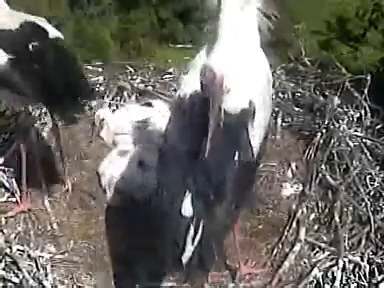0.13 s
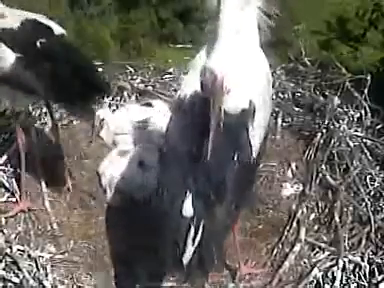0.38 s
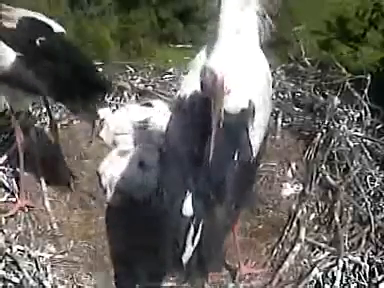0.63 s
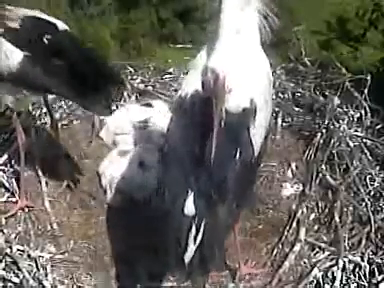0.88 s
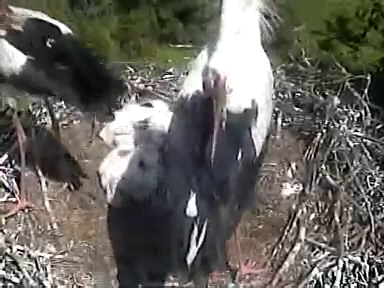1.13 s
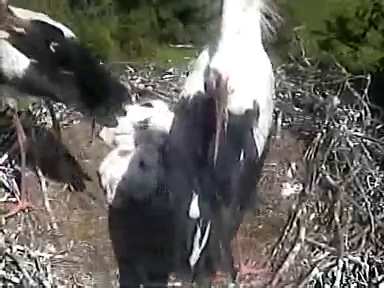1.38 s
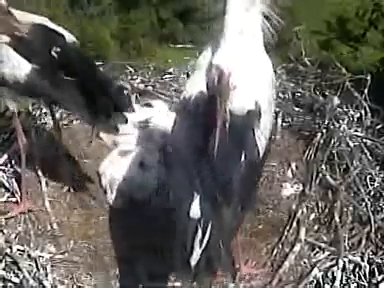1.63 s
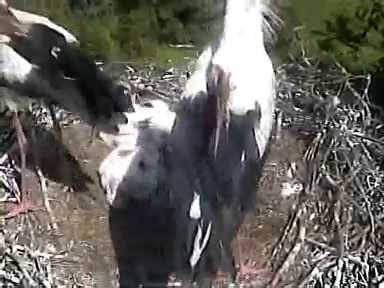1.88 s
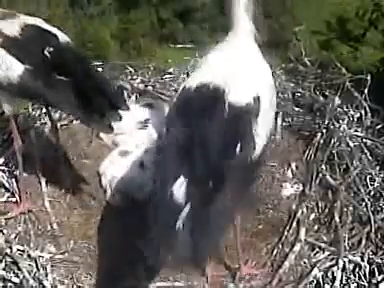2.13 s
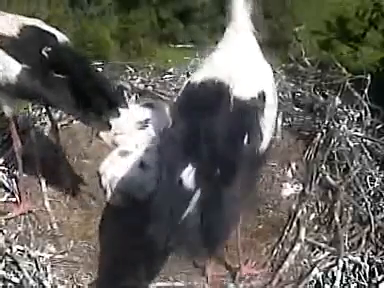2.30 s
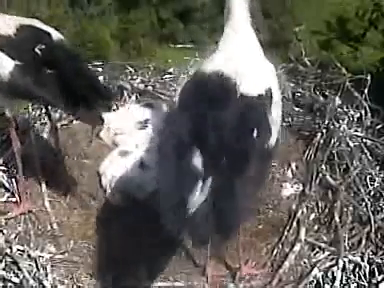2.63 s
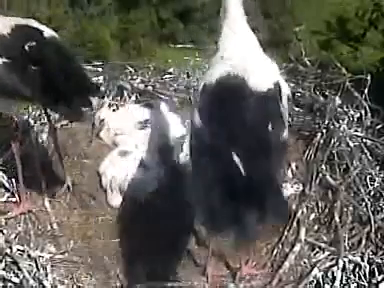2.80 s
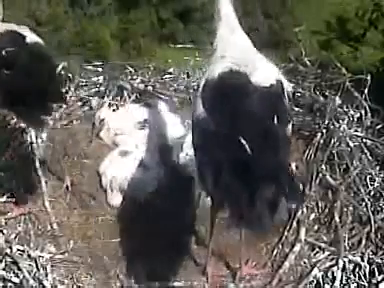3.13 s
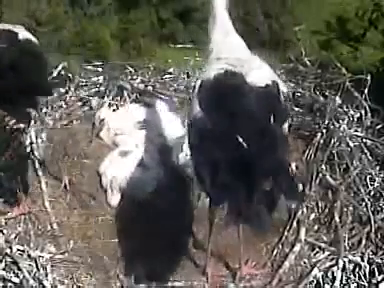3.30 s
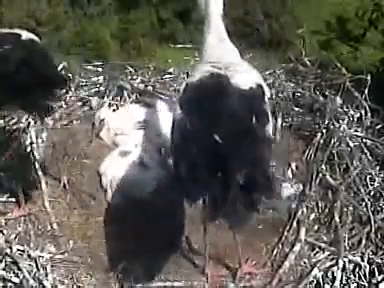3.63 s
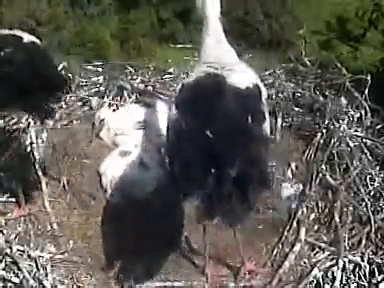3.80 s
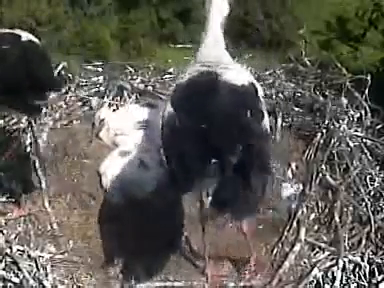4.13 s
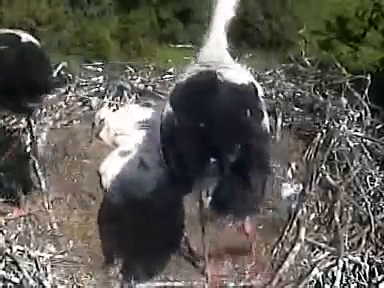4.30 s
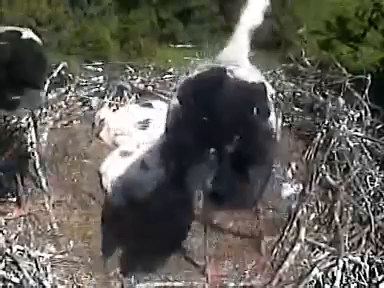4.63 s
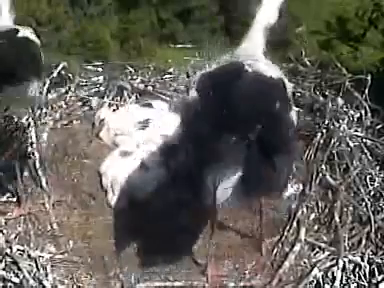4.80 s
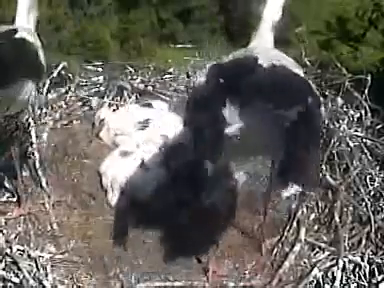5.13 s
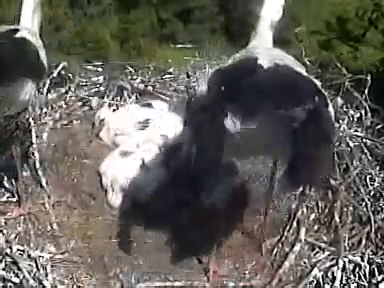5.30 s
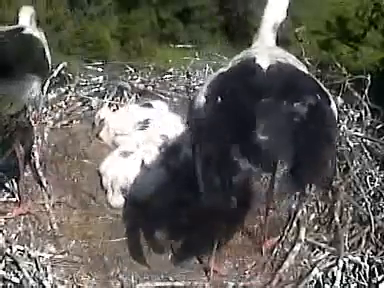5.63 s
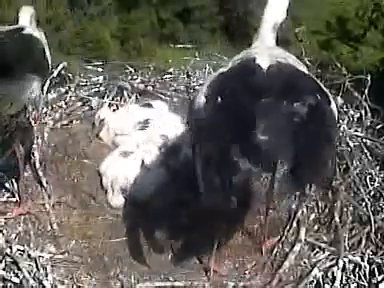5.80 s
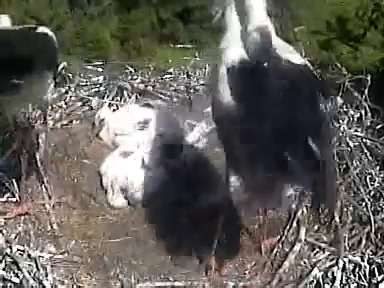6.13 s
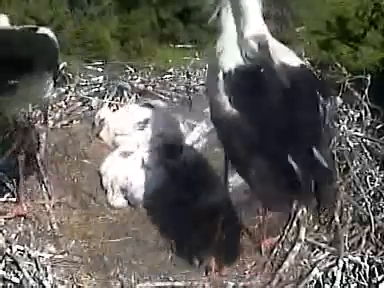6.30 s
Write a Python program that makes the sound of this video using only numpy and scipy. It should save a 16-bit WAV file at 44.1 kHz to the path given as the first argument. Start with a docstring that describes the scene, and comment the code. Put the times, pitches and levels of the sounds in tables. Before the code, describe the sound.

Rapid wooden bill clattering from two storks at a nest, drifting in and out of step, with faint leaves and wind behind.

```python
"""At a nest outdoors, two storks clatter their bills, each at its own pace, drifting in and out of step.
Every clap rings the throat pouch, the hollow bill and its horn; the pitch moves as the neck bends.
Twigs and feathers scatter each clap into a short tail, and a patchy fizz clings to it.
Behind them sits a bed of leaves and distant air; wind rumbles on a mono microphone that overloads."""
import sys
import numpy as np
from scipy import signal
from scipy.io import wavfile
from scipy.ndimage import uniform_filter1d

SR = 44100
rng = np.random.default_rng(int(sys.argv[2]) if len(sys.argv) > 2 else 0)


def store_wav(level_fs):
    """Save 16-bit WAV to argv[1]."""
    pcm = np.round(np.clip(np.atleast_2d(level_fs), -1, 1) * 32767)
    wavfile.write(sys.argv[1], SR, pcm.T.astype(np.int16))


N = 285327

# leaves and distant air, fader ride: t/s, level/dB
AIR_RIDE = [(0.0, -27.5), (0.59, -38), (0.83, -33.5), (1.22, -36.5), (1.55, -37), (1.96, -40), (2.38, -37),
            (2.74, -38), (2.92, -35), (3.73, -38.5), (4.56, -34), (4.76, -36.5), (6.47, -34.5)]
# their tone colour: f/Hz, relative density/dB
AIR_COLOUR = [(200, -50), (400, 5), (700, -2.5), (1100, -1.5), (1750, -2), (3100, -9.5), (4740, -15),
              (5370, -12.5), (7070, -29.5), (9000, -28.5)]
# gusts on the microphone: t/s, level/dB
WIND_RIDE = [(0.0, -31), (0.05, -19.5), (0.14, -21), (0.2, -16.5), (0.31, -19), (0.95, -30), (0.97, -23.5),
             (1.26, -32), (1.51, -25.5), (1.58, -34), (3.26, -27), (3.33, -33), (3.44, -20), (3.49, -27),
             (3.87, -22), (3.91, -29), (4.14, -23), (4.18, -26.5), (5.06, -23.5), (5.32, -21.5),
             (5.49, -26), (5.53, -22), (6.27, -27), (6.47, -26)]
# their tone colour: f/Hz, relative density/dB
WIND_COLOUR = [(12, -32), (20, -2.5), (49, 3), (139, -7.5), (257, -13), (370, -26), (450, -17), (580, -38),
               (990, -120)]
# hiss around the claps: f/Hz, level/dB relative to the claps in that band
FIZZ_COLOUR = [(300, -2.5), (750, -16), (1100, -9.5), (1600, -16.5), (2500, -8.5), (3500, -8.5), (4500, 0),
               (5400, -2), (6200, -3.5), (7500, 7)]
# early reflections at the nest: delay/s, level/dB
NEST_ECHOES = [(.015, -33), (.024, -27.5)]
# horn modes of the mandibles: f/Hz, level/dB relative to crack or tip snap, t60/s
HORN_MODES = [(400, -4, 0.0029), (1307, -1.5, 0.0042), (2076, -9.5, 0.023), (3160, -7, 0.017),
              (3568, -5.5, 0.0089), (4123, -7, 0.029), (4915, -8.5, 0.0073), (5320, -6, 0.013),
              (6797, -11, .008)]
# neck and bill posture, near then far bird, levels relative to the clap: t/s, pouch f/Hz, pouch level/dB,
# main bill mode f/Hz, second mode f/Hz, second mode level/dB, crack level/dB, snap level/dB, bill t60/ms
POSTURES = [
    [(0.05, 731, -9.5, 1541, 2360, -12.5, -9.5, -11.5, 16), (1.2, 755, -4, 1582, 2550, -11.5, -6, -7, 15),
     (1.6, 760, -2, 1634, 2620, -3, -3.5, -5, 15), (1.85, 814, 0, 1745, 2830, -0.5, -2.5, -4.5, 16),
     (2.02, 754, -3.5, 1830, 2810, -8, -9, -10.5, 8.5), (2.13, 767, -6, 2196, 2980, -11, -9.5, -14.5, 11),
     (2.36, 720, -4, 2144, 3040, -6.5, -11.5, -16, 9.1), (2.7, 680, -3.5, 1930, 2670, -1, -10.5, -24, 4.6),
     (3.0, 670, 1, 1760, 2530, 2, -8.5, -15, 7.4), (3.5, 674, 1, 1775, 2530, 4, -8.5, -17.5, 5.3),
     (3.85, 675, 3.5, 1710, 2640, 1, -8.5, -13.5, 5.8), (4.3, 668, 2, 1770, 2650, -16, -6.5, -14.5, 6.3),
     (4.85, 684, -1, 1773, 2540, -8, -15.5, -20.5, 7.2),
     (5.45, 695, -1.5, 1820, 2660, -12, -14.5, -17, 6.7), (5.7, 708, 5, 1790, 2760, -2, -5, -5, 7.3),
     (5.9, 687, 0, 1560, 2450, -17, -8, -18.5, 12), (6.1, 740, -7.5, 1597, 2565, -12, -11.5, -17, 14),
     (6.42, 715, -6.5, 1578, 2510, -6, -10, -12.5, 15.7)],
    [(0.03, 797, -6, 1630, 2550, -5, -6, -9.5, 9.3), (0.5, 795, -5.5, 1685, 2570, -2.5, -7, -14.5, 11.4),
     (1.0, 857, -6, 1680, 2680, -5, -8.5, -18, 9.3), (1.5, 803, -2.5, 1700, 2480, -5.5, -5, -7, 12),
     (1.8, 820, -4, 1746, 2546, 8.5, -7, -11, 9), (2.1, 843, -4, 1800, 2800, -2.5, -8.5, -21, 6.2),
     (2.43, 870, -8, 1940, 2660, -2, -11.5, -14.5, 5.1), (2.57, 790, -3, 2100, 2870, -4, -7.5, -12, 12),
     (2.7, 846, 3, 1970, 1600, 0, -3, -14, 9.5), (2.84, 785, 2, 2366, 1900, -6.5, -1, -12.5, 17),
     (3.69, 744, 4.5, 2350, 1880, -4.5, -6, -6.5, 13), (3.97, 766, 2.5, 2100, 2670, -7, -7, -18, 9),
     (4.4, 727, 0.5, 2190, 2860, -12, -8, -17, 9.6), (4.69, 755, -3.5, 2270, 3020, -13, -5.5, -19, 10.5),
     (5.0, 740, 3, 2010, 2700, -2, -5, -14.5, 8.4), (5.5, 758, -3.5, 2165, 2880, -10.5, -9.5, -18, 9),
     (6.3, 757, -0.5, 2240, 3030, -11, -4.5, -18.5, 11.6)],
]
# attack of the main bill mode, near then far bird: rise/s
BILL_ATTACKS = [0.0026, 0.0018]
# clap cues, near then far bird: t/s, level/dB of the main bill mode
CLAP_CUES = [
    [(0.0564, 0.5), (0.1393, -0.5), (0.2194, 1), (0.2997, -1), (0.3809, 1), (0.4615, -0.5), (0.5445, 0),
     (0.6277, 1), (0.7132, -1), (0.7981, 0), (0.8835, 0.5), (0.9692, 0), (1.0552, -1.5), (1.139, -1),
     (1.228, 0.5), (1.319, -1.5), (1.4099, -4), (1.5049, -3), (1.6017, -4), (1.7008, -6.5), (1.803, -6.5),
     (1.9089, -5.5), (2.017, -3.5), (2.1307, -4.5), (2.2445, -2), (2.3553, -2), (2.468, -4.5), (2.5815, -4),
     (2.6955, -7), (2.8101, -7), (2.925, -9), (3.0381, -10), (3.1503, -7.5), (3.2642, -10.5),
     (3.3781, -9.5), (3.49, -9.5), (3.603, -10), (3.7159, -11), (3.83, -11.5), (3.9433, -12), (4.0576, -10),
     (4.1709, -10.5), (4.2836, -8.5), (4.3955, -9.5), (4.509, -8.5), (4.623, -6.5), (4.736, -7.5),
     (4.8483, -4.5), (4.959, -6.5), (5.069, -6), (5.1799, -5.5), (5.2872, -5), (5.396, -4.5),
     (5.5009, -6.5), (5.5957, -9.5), (5.6759, -14.5), (5.7579, -19), (5.8306, -21.5), (5.897, -14),
     (5.9698, -6), (6.044, -4.5), (6.1185, -2), (6.1885, -1), (6.2644, -1.5), (6.342, -1), (6.4195, -2)],
    [(0.0304, -5.5), (0.1255, -5), (0.2231, -17), (0.3145, -5), (0.4083, -6), (0.5023, -7), (0.6003, -6),
     (0.6925, -6), (0.789, -7), (0.8865, -12), (0.9849, -6.5), (1.0802, -5), (1.18, -6.5), (1.284, -8),
     (1.3872, -8), (1.491, -6), (1.5975, -7), (1.7035, -6.5), (1.8106, -8), (1.9206, -7.5), (2.034, -7),
     (2.1572, -7.5), (2.2862, -6.5), (2.427, -5), (2.5661, -9.5), (2.7039, -15.5), (2.8388, -15),
     (2.9782, -15), (3.1196, -15.5), (3.2625, -14.5), (3.404, -16), (3.5454, -18), (3.687, -15.5),
     (3.8305, -12.5), (3.9726, -15), (4.118, -15), (4.264, -15), (4.4057, -10.5), (4.5481, -9.5),
     (4.6889, -8.5), (4.8345, -13), (4.9753, -13), (5.1207, -12.5), (5.2677, -12), (5.4143, -9.5),
     (5.5603, -9), (5.7059, -8.5), (5.849, -11), (5.995, -10.5), (6.1384, -12), (6.2832, -12.5),
     (6.4242, -11)],
]

CLOSING_S, POUCH_T60_S = 0.0017, 0.018   # base attack of a clap; decay of the pouch
DAMPING_CURVE = 1.27   # above 1: the shut bill chokes the ring ever faster
CRACK_T60_S, CRACK_BAND_HZ = 0.016, (2340, 3030)
TIP_FROM_HZ = 3850   # horn modes above this belong to the thin tips
SCATTER_DB, SCATTER_T60_S = -9, 0.061
FIZZ_SMOOTH_S, FIZZ_LEAD_S = 0.022, 0.0025
PEAK_HZ, PEAK_WIDTH_HZ, PEAK_MIX_DB = 5380, 310, -4.5   # small resonance in front of the diaphragm
PREAMP_CEILING = 0.92
CAPSULE_ROLL_HZ, INPUT_CUT_HZ, TOP_CUT_HZ = 5700, 7350, 15800


def from_db(db):
    return 10 ** (np.asarray(db) / 20)


def fader(ride):
    s, db = np.transpose(ride)
    return from_db(np.interp(np.arange(N) / SR, s, db))


def unit_rms(x):
    return x / np.sqrt(np.mean(x ** 2))


def bandpass(x, edges_hz):
    return signal.sosfilt(signal.butter(2, edges_hz, "band", fs=SR, output="sos"), x)


def band_db(colour, edges_hz):
    """Level of a colour curve at the centre of a band."""
    hz, db = np.transpose(colour)
    return np.interp(np.log(edges_hz).mean(), np.log(hz), db)


def drift(rate_hz):
    """Slow random modulation with a spread of about 1."""
    knots_per_s = 60
    knots = rng.standard_normal(int(N / SR * knots_per_s) + 202)
    pole = np.exp(-2 * np.pi * rate_hz / knots_per_s)
    slow = unit_rms(signal.lfilter([1], [1, -pole], knots)[200:])
    return np.interp(np.arange(N) / SR * knots_per_s, np.arange(len(slow)), slow)


def noise_bed(colour, low_hz, flicker_db, flicker_hz):
    """Ten half-octave noise bands that flicker partly together, partly alone; rms 1."""
    out, together, white = 0, drift(flicker_hz), rng.standard_normal((2, N))
    for k in range(10):
        edges = low_hz * 2 ** (np.array([k, k + 1]) / 2)
        wobble_db = flicker_db * (1.7 * together + drift(flicker_hz))
        out += bandpass(white[k % 2], edges) * from_db(band_db(colour, edges) + wobble_db)
    return unit_rms(out)


def leaves_and_air():
    """A soft midrange bed of rustling leaves and distant air."""
    return fader(AIR_RIDE) * noise_bed(AIR_COLOUR, low_hz=300, flicker_db=1.2, flicker_hz=5)


def wind():
    """Gusts buffet the microphone into a low rumble."""
    return fader(WIND_RIDE) * noise_bed(WIND_COLOUR, low_hz=17.98, flicker_db=1.0, flicker_hz=6.9)


def fizz(claps):
    """A patchy hiss swells and fades around each clap, following its level band by band."""
    out, white = 0, rng.standard_normal((2, N))
    width, lead = round(FIZZ_SMOOTH_S * SR), round(FIZZ_LEAD_S * SR)
    for k in range(13):
        edges = 300 * 2 ** (np.array([k, k + 1]) * 3 / 8)
        sidechain = np.roll(bandpass(claps + 1e-9, edges), -lead)
        power = uniform_filter1d(uniform_filter1d(sidechain ** 2, width), width)
        hiss = unit_rms(bandpass(white[k % 2], edges))
        level_db = band_db(FIZZ_COLOUR, edges) + 3.7 * drift(rate_hz=12)
        out += from_db(level_db) * np.sqrt(np.abs(power)) * hiss
    return out


def nest(clap):
    """Two early reflections, plus a tail off twigs and feathers, new each time since the heads move."""
    t = np.arange(3500) / SR
    response = rng.standard_normal(len(t)) * from_db(-60 * t / SCATTER_T60_S)
    response *= from_db(SCATTER_DB) / np.sqrt(np.sum(response ** 2))
    response[0] = 1   # direct sound
    for delay, db in NEST_ECHOES:
        response[round(delay * SR)] += from_db(db)
    return signal.fftconvolve(clap, response)


def clap_envelope(t, t60, rise):
    """Swells while the bill closes along its length, then dies away; peak 1."""
    shape = (1 - np.exp(-t / rise)) * from_db(-60 * (t / t60) ** DAMPING_CURVE)
    return shape / shape.max()


def ring(t, hz, db, t60, rise):
    """One struck mode: a sine under the clap envelope."""
    return from_db(db) * clap_envelope(t, t60, rise) * np.sin(2 * np.pi * hz * t)


def voiced_claps():
    """Each clap takes its pitch, balance and decay from its bird's posture at that moment."""
    claps = []
    for cues, posture, attack_s in zip(CLAP_CUES, POSTURES, BILL_ATTACKS):
        posture_s, *curves = np.transpose(posture)
        for s, db in cues:
            pose = [np.interp(s, posture_s, curve) for curve in curves]
            claps.append((s, db, attack_s, pose))
    return claps


def clatter():
    """Bills snap shut: pouch and bill cavity give the body, the horn a bite that varies clap by clap."""
    out, t = np.zeros(N + 5000), np.arange(1500) / SR
    claps = voiced_claps()
    variations = rng.standard_normal((len(claps), len(HORN_MODES), 2))
    grits = unit_rms(bandpass(rng.standard_normal((len(claps), len(t))), CRACK_BAND_HZ))
    for (s, clap_db, attack_s, pose), variation, grit in zip(claps, variations, grits):
        pouch_hz, pouch_db, main_hz, second_hz, second_db, crack_db, snap_db, t60_ms = pose
        bill_t60 = max(t60_ms, 5) / 1000
        clap = -ring(t, pouch_hz, pouch_db, POUCH_T60_S, CLOSING_S)
        clap -= ring(t, main_hz, 0, bill_t60, attack_s)
        clap += ring(t, second_hz, second_db, 0.7 * bill_t60, 1.8 * CLOSING_S)
        # the edges meet point by point: a gritty crack, then the horn rings
        clap += from_db(crack_db - 10.5) * grit * clap_envelope(t, CRACK_T60_S, 0.12 * CLOSING_S)
        for (hz, db, t60), (detune, accent) in zip(HORN_MODES, variation):
            hit_db = snap_db if hz > TIP_FROM_HZ else crack_db
            clap += ring(t, hz * (1 + 0.063 * detune), hit_db + db + 1.7 * accent, t60, 1.2 * CLOSING_S)
        wet = nest(from_db(clap_db) * clap)
        out[round(s * SR):][:len(wet)] += wet
    return out[:N]


def scene():
    """Background, claps and fizz in one mono mix, the same on both channels."""
    background = wind() + leaves_and_air()
    claps = clatter()
    return np.tile(background + claps + fizz(claps), (2, 1))


def record(dry):
    """The capsule adds a peak, the preamp saturates, and low-passes around a hard clip dull the top."""
    resonance = signal.iirpeak(PEAK_HZ, PEAK_HZ / PEAK_WIDTH_HZ, fs=SR)
    peaked = dry + from_db(PEAK_MIX_DB) * signal.lfilter(*resonance, dry)
    saturated = PREAMP_CEILING * peaked / (PREAMP_CEILING ** 8 + peaked ** 8) ** (1 / 8)
    dull = signal.sosfilt(signal.butter(2, CAPSULE_ROLL_HZ, fs=SR, output="sos"), saturated)
    narrow = signal.sosfilt(signal.ellip(10, 0.5, 55, INPUT_CUT_HZ, fs=SR, output="sos"), dull)
    clipped = np.clip(narrow, -1, 1)
    return signal.sosfilt(signal.cheby2(12, 70, TOP_CUT_HZ, fs=SR, output="sos"), clipped)


dry = scene()
out = record(dry)
store_wav(out)
```